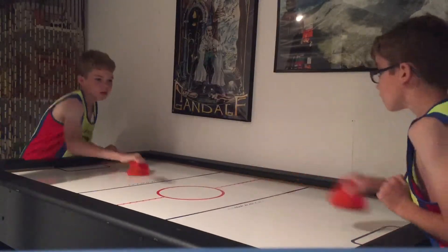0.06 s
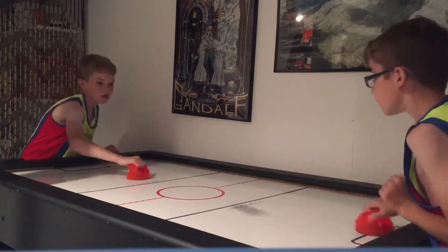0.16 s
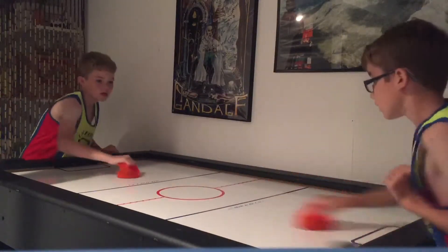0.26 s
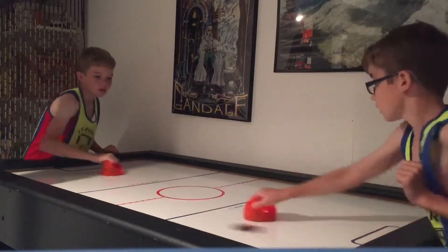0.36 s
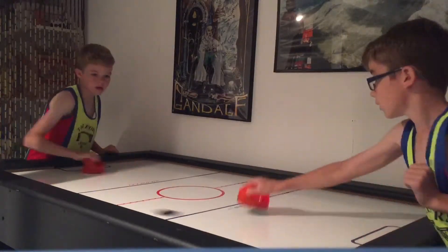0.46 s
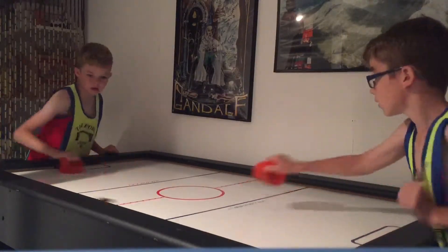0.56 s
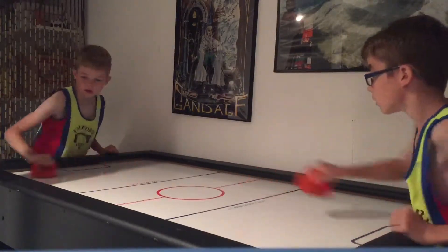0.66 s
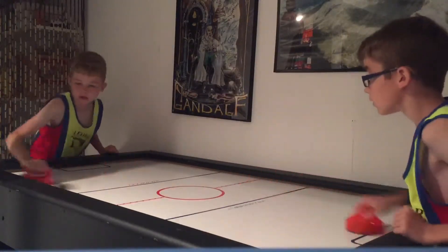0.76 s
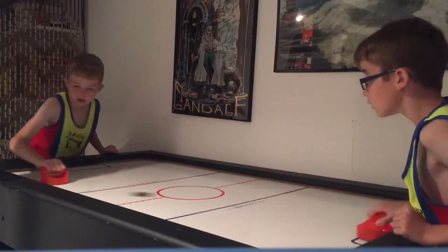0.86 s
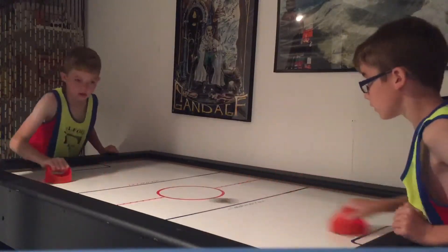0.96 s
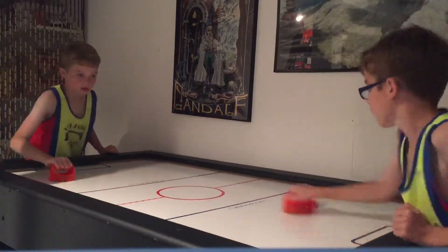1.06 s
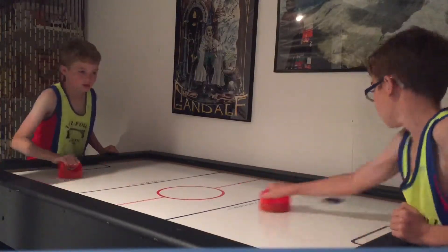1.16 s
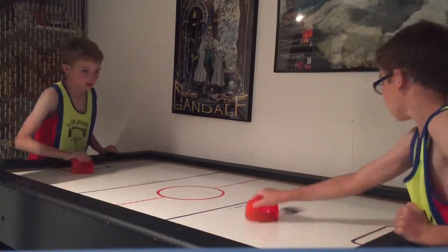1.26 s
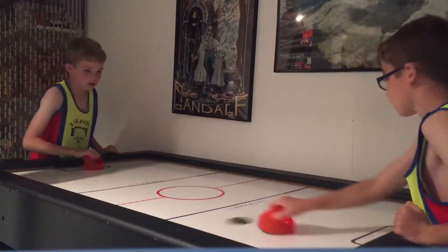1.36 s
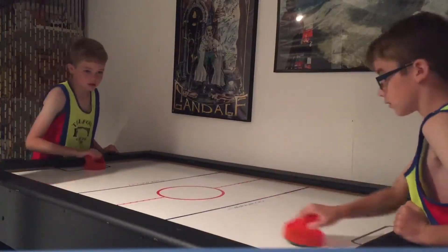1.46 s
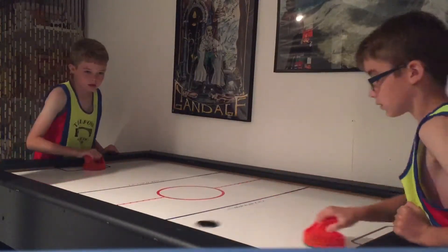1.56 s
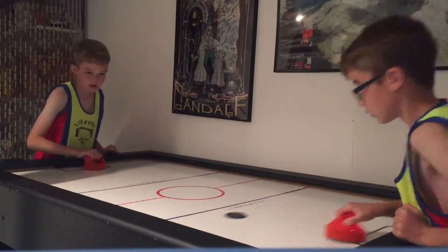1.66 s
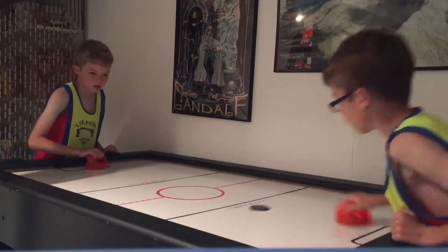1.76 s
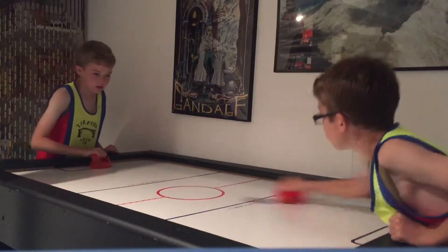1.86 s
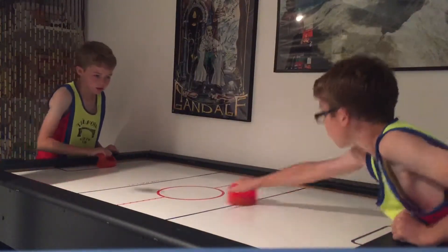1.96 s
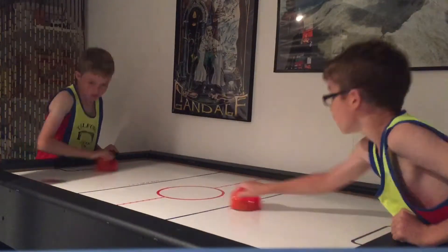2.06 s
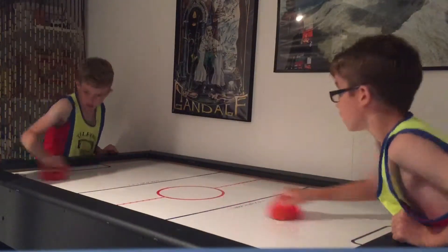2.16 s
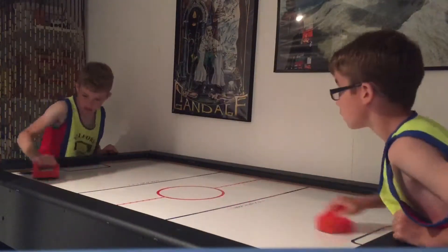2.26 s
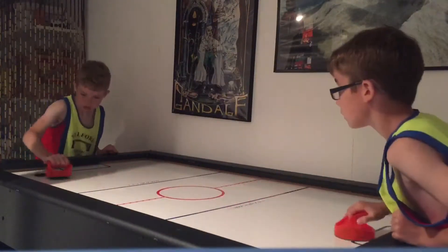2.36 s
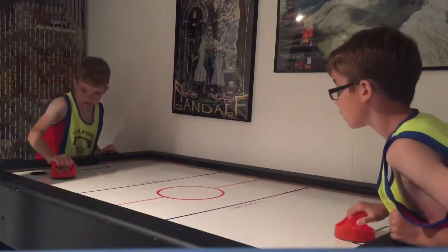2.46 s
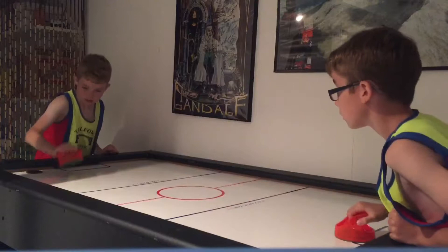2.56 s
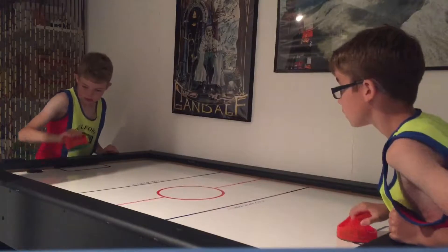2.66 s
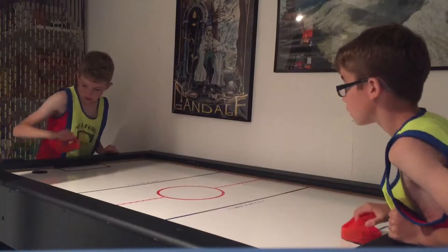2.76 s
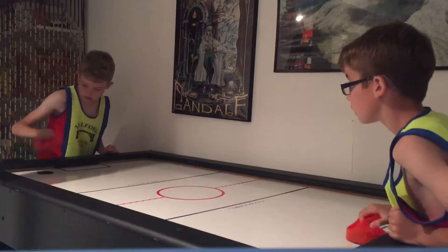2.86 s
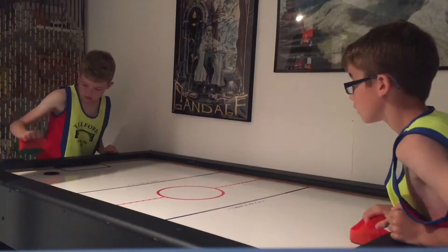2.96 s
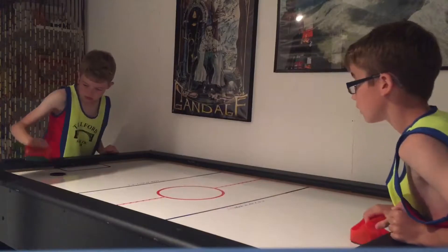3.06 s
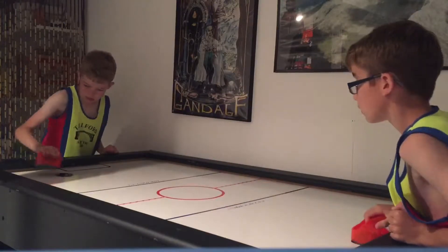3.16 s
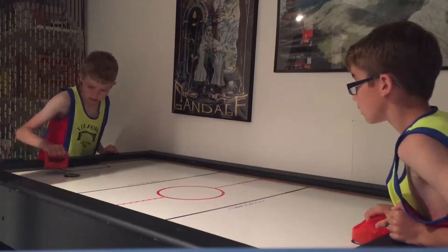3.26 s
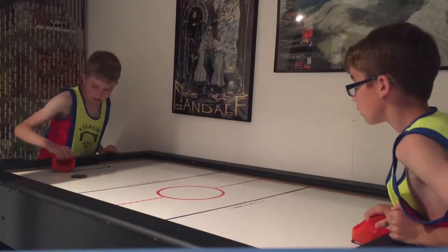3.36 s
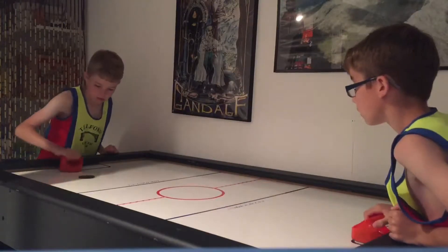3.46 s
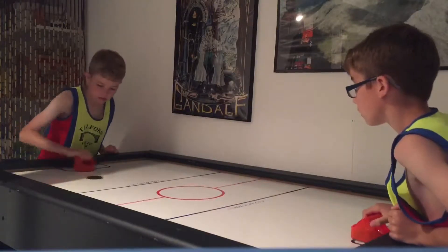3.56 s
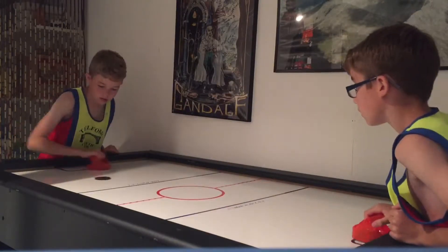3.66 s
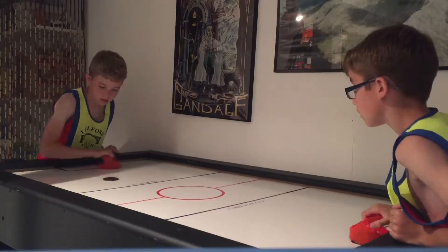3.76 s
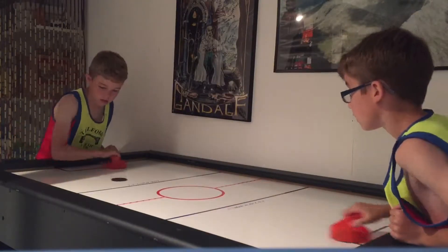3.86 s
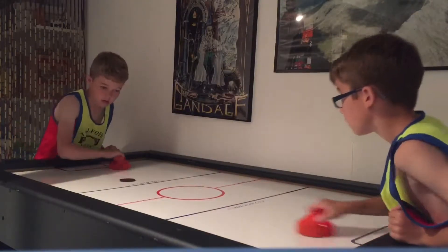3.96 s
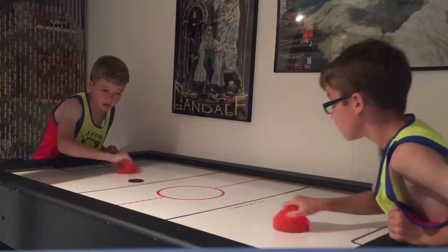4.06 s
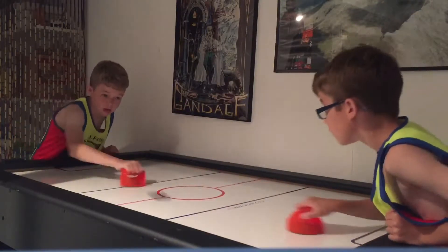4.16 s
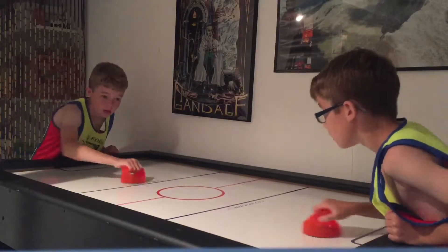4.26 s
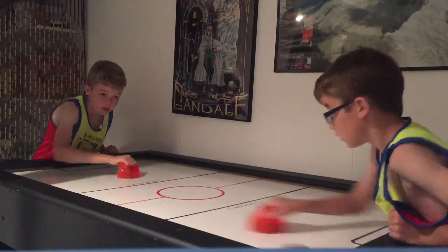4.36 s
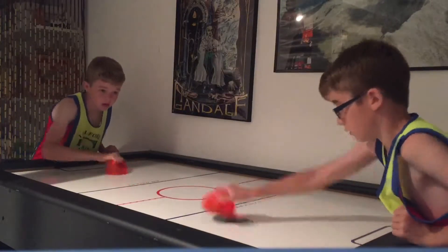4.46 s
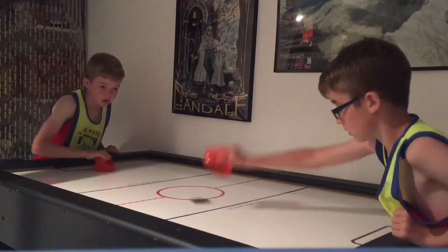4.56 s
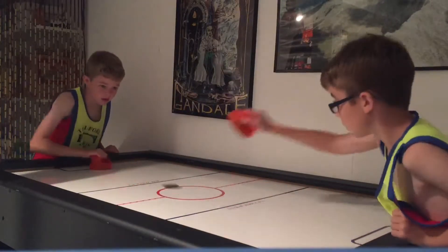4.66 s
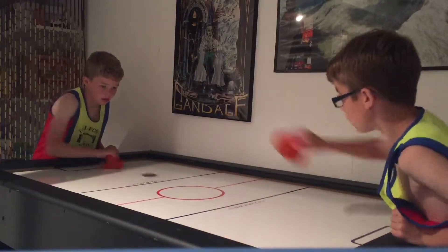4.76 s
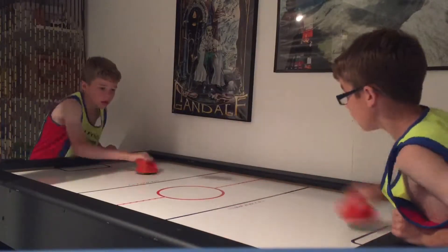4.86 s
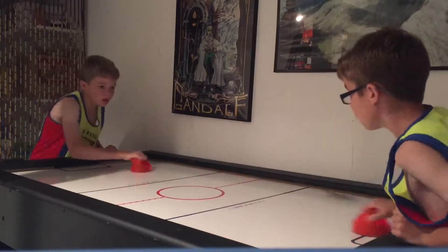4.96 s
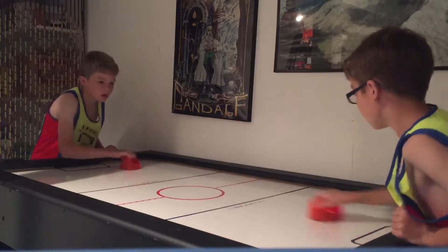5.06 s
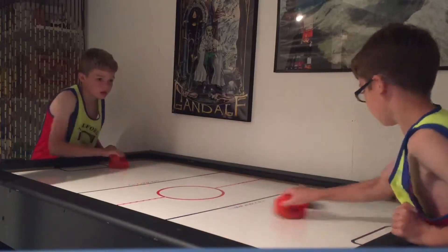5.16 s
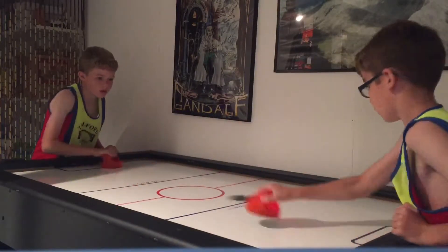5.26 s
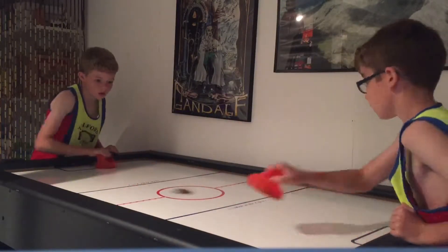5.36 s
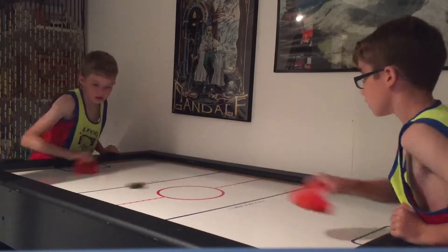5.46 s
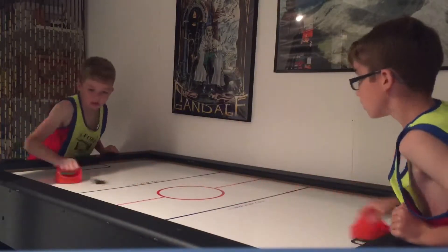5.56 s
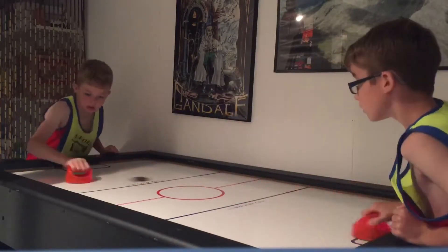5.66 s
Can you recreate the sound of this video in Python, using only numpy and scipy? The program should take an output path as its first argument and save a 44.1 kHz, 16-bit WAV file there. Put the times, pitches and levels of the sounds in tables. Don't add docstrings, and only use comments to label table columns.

```python
import sys
import numpy as np
from scipy import signal
from scipy.fft import rfft, irfft
from scipy.io import wavfile

SR = 44100
rng = np.random.default_rng(int(sys.argv[2]) if len(sys.argv) > 2 else 0)


def bounce(signal):
    frames = np.transpose(np.atleast_2d(signal))
    limited = np.clip(frames, -1, 1)
    pcm = np.round(limited * 32767).astype(np.int16)
    wavfile.write(sys.argv[1], SR, pcm)


def magnitude_from_level(level_db):
    exponent = np.asarray(level_db, float) / 20
    return 10 ** exponent


N = 251804
LEAD = SR // 2
PLACES = 3
SILENT_DB = -120

# start in seconds, clack level in dB,
# hollow tone and bending ring, both in dB relative to the clack.
MALLET_HITS = [
    (0.1045, -1.5, -17.5, -9),
    (0.7908, 0, -6.5, -10.5),
    (1.9214, -8.5, -7, -17),
    (2.2674, -7.5, -31.5, -27.5),
    (4.1844, -4, -19.5, -43),
    (4.8792, -1, -14, -23),
]
MALLET_CRACK_DB, MALLET_ROOM_DB = -2.5, -1.5
# start in seconds, clack level in dB, # crack in dB relative to the clack, distance as room
# share in dB.
RAIL_HITS = [(0.3192, 2, -18.5, 1.55), (1.1278, -8.5, -11.5, -1), (1.1866, 3.5, -17, -0.16),
             (1.5403, -4, -21.5, -1.3), (1.5462, -4.5, -22, -2.5), (2.1975, -4, -18, 2.5),
             (2.2105, -2, -14.5, -1.5), (2.3199, -6.5, -15.5, -1.5), (2.4128, -12, -10, -2.5),
             (4.3472, -10, -18.5, 7.5), (4.4002, 1, -21.5, 0.2)]
EARLIER_RAIL_HIT = (2.5, -13, 2.5)
EARLIER_AGO_S = 0.42
RAIL_TONE_DB, RAIL_RING_DB = -8.5, -32.5
# start in seconds, clack level in dB,
# crack and bending ring, both in dB relative to the clack, room share in dB.
EDGE_HITS = [
    (4.983, -10, -3.5, -9, 1.5),
    (5.0859, -20.5, -2, 0, 1),
    (5.1059, -0.7, -10, -3, -1.2),
    (5.1628, -13, -24, -2.1, -12),
    (5.2218, -15, -2, -23, -2),
    (5.4533, -25.5, -1, -6, 4.5),
    (5.5618, -22.5, 0.3, -1, 0),
    (5.6561, -9, -2.5, -3, 0.5),
]
EDGE_TONE_DB = -5.5
# start in seconds, clack level in dB.
TAPS = [
    (0.7714, -24),
    (2.6994, -35),
    (2.9693, -58.5),
    (5.008, -23),
    (5.6285, -23),
]
TAP_TONE_DB, TAP_RING_DB, TAP_CRACK_DB = 8, -29, -28
# start in seconds, knock of the top in dB,
# boom of the box in dB relative to the knock.
THUDS = [(0.107, -9, -19.5), (0.165, -18, -16.5), (0.22, -13, -20), (0.322, -20, -30), (0.661, -52, -9),
         (0.794, -20, -15), (0.831, -6.5, -17.5), (1.127, -17.5, -29), (1.2, -25.5, -39), (1.542, -41, -28),
         (1.839, -37, -4), (1.921, -15.5, -17), (1.97, -18, -17), (2.208, -30.5, -8.5), (2.273, -18, -22),
         (2.421, -38, -9), (3.454, -40.5, -3.5), (3.495, -43, -3), (3.687, -33, -11), (4.189, -19, -14.5),
         (4.26, -23, -21), (4.397, -25, -33), (4.88, -5.5, -17.5), (4.96, -15, -14), (5.015, -16.5, -30),
         (5.108, -28, -36), (5.629, -9, -16.5), (5.659, -12, -22)]
THUD_ROOM_DB = 23
# end in seconds, swell in seconds,
# hiss at the end in dB, dying in seconds.
SWEEPS = [
    (3.707, .017, -58, .018),
    (4.18, 0.42, -61.5, .07),
    (4.87, 0.16, -62, .08),
]
SWELL_DB, DYING_DB = 19, 23

WOBBLE_FROM_S, WOBBLE_RISE_S, WOBBLE_DB, WOBBLE_FADE_DB_PER_S = 4.95, 0.1, -38, 8
CHATTER_S, CHATTER_RISE_S, CHATTER_DB, CHATTER_FADE_DB = 5.12, 0.045, -23.5, 123
WOBBLE_UNEVEN_DB = 4

# resonance in Hz, width in Hz, level in dB.
CLACK = [(1000, 295, -1.5), (1725, 457, -2), (2090, 357, 0), (2627, 484, -2.5), (3600, 645, -9)]
# resonance in Hz, width in Hz, level in dB.
HOLLOW_RAIL = [(351.6, 97, -6.5), (463, 136, -2), (640.5, 88, 4.5), (873, 91, -1.5)]
# resonance in Hz, width in Hz, level in dB.
PUCK_BENDING = [(1712, 80, -7), (3815, 90, 0)]
# resonance in Hz, width in Hz, level in dB.
PUCK_HIGH = [(3257, 390, 2.5), (5620, 250, 0.5), (6485, 130, 2.5), (7300, 200, 0), (9560, 400, -1.5),
             (10600, 60, -15.5), (13030, 200, -3), (15400, 470, -6.5)]
# resonance in Hz, width in Hz, level in dB.
RIM_HIGH = [(5700, 350, -6), (6470, 90, 0), (7000, 250, -5), (9550, 300, -5), (10700, 220, -6),
            (13300, 250, -14), (14900, 500, -13)]
EDGE_DULL_HZ, EDGE_RIM_DB = 4700, 12
FIRST_TOUCH_DB = 8.5
# resonance in Hz, width in Hz, level in dB.
TABLE_TOP = [(170, 41.4, 1), (198, 42.7, 2.5), (237, 47.5, -2), (349, 114, -3.5)]
# resonance in Hz, width in Hz, level in dB.
BOX = [(63, 16, -1.5), (82.4, 28.6, -0.92)]

# frequency in Hz, time to fall 60 dB in seconds.
ROOM_T60 = [(60, 0.85), (200, 0.65), (500, 0.76), (1000, 0.73), (2000, 0.85), (4000, 0.81), (8000, 0.59),
            (16000, 0.28)]
# frequency in Hz, level in dB.
ROOM_COLOUR = [(60, -12.5), (200, 2.5), (600, 0), (2000, 1.5), (5000, -1), (10000, -6), (16000, -2)]
ROOM_DB = 0.5
LATE_DB, LATE_STRETCH = -16.5, 1.97

# frequency in Hz, level in dB per Hz.
BLOWER_AIR = [(20, -32), (45, -15), (85, -7), (112, -14), (135, -17.5), (280, -12), (363, -10.5),
              (624, -6.5), (960, -4.5), (1160, -14.5), (2160, -18), (6380, -39), (9000, -44.5),
              (16000, -62)]
# frequency in Hz, width in Hz, rms level in dB.
BLOWER_TONES = [(875, 89, -49.5), (1730, 207, -64), (3500, 270, -65.5), (5470, 230, -78.5),
                (6800, 150, -80.5), (8060, 170, -71), (9300, 150, -83)]
BLOWER_DB, BLOWER_UNEVEN_DB = -41.5, 2.5
HUM_HZ, HUM_DB = 102.7, -54
TOP_HZ = 15850


def blow_rows():
    rows = []
    for s, db, tone, ring in MALLET_HITS:
        rows.append((s, db, tone, ring, MALLET_CRACK_DB, SILENT_DB, MALLET_ROOM_DB))
    for s, db, crack, far in [(-EARLIER_AGO_S, *EARLIER_RAIL_HIT)] + list(RAIL_HITS):
        rows.append((s, db, RAIL_TONE_DB, RAIL_RING_DB, crack, SILENT_DB, far))
    for s, db, crack, ring, far in EDGE_HITS:
        rows.append((s, db, EDGE_TONE_DB, ring, SILENT_DB, crack, far))
    for s, db in TAPS:
        rows.append((s, db, TAP_TONE_DB, TAP_RING_DB, TAP_CRACK_DB, SILENT_DB, 0))
    return sorted(rows)


def blows():
    s, db, low_db, ring_db, crack_db, rim_db, room_db = np.transpose(blow_rows())
    hit = strikes(s, db, room_db, 0.99, 0.0047, 0.007, to_room_db=22.0)
    clack = cut(body(hit, CLACK, 6.44), 936, "high", order=4)

    hollow_hit = strikes(s, db + low_db, room_db, 0.21, 0.0046, 0.013, to_room_db=22.0)
    hollow = body(hollow_hit, HOLLOW_RAIL, 11.36)

    bending_hit = strikes(s, db + ring_db, room_db, 0.26, 0.0045, 0.0044, to_room_db=19.0)
    ring = body(bending_hit, PUCK_BENDING, 21.7)

    contact = strikes(s, db + crack_db, room_db, 0.39, 0.0056, 0.0016, to_room_db=22.0)
    crack_noise = cut(cut(contact, 3900, "high"), 6500, "low", order=1)
    crack = magnitude_from_level(2.0) * crack_noise + body(contact, PUCK_HIGH, 6.6)

    edge = strikes(s, db + rim_db, room_db, 0.47, 0.0065, 0.002, to_room_db=20.0)
    rim_noise = cut(cut(edge, 4200, "high"), EDGE_DULL_HZ, "low", order=1)
    rim = magnitude_from_level(-1.5) * rim_noise + body(edge, RIM_HIGH, EDGE_RIM_DB)
    return clack + hollow + ring + crack + rim


def strikes(s, level_db, room_db, start, rise_s, fall_s, to_room_db):
    t = np.arange(SR // 20) / SR
    rise = np.minimum(start + (1 - start) * (t / rise_s) ** 2, 1)
    shape = rise * np.exp(-np.maximum(t - rise_s, 0) / fall_s)
    out = np.full((1 + PLACES, N + LEAD), 1e-18)
    at = (s * SR).round().astype(int) + LEAD
    grains = rng.standard_normal((len(s), len(t)))
    grains[:, 0] = magnitude_from_level(FIRST_TOUCH_DB)
    for i, db, grain in zip(at, level_db, grains):
        out[0, i:i + len(t)] += (magnitude_from_level(db) * shape * grain)[:N + LEAD - i]
    out[1 + np.arange(len(s)) % PLACES, at] = magnitude_from_level(level_db + room_db + to_room_db)
    return out


def body(bursts, modes, gain_db):
    out = 0
    for k, (hz, width, db) in enumerate(modes):
        out = out + (-1) ** k * magnitude_from_level(db) * resonate(bursts, hz, width)
    return magnitude_from_level(gain_db) * out


def thuds():
    s, db, boom_db = np.transpose(THUDS)
    knock_hit = strikes(s, db, 0, 0.86, 0.0068, 0.0099, to_room_db=THUD_ROOM_DB)
    boom_hit = strikes(s, db + boom_db, 0, 0.96, 0.012, 0.015, to_room_db=32.0)
    knock = body(knock_hit, TABLE_TOP, 17.05)
    boom = body(boom_hit, BOX, 30.6)
    return cut(knock + boom, 450, "low", order=4)


def wobble():
    ticks_per_s = 1500.0
    ticks = (rng.random(N + LEAD) < ticks_per_s / SR) * rng.standard_normal(N + LEAD) + 1e-18
    ringing = body(ticks, PUCK_BENDING, 3.2) + body(ticks, RIM_HIGH, -7)
    ringing = ringing + magnitude_from_level(-25.5) * cut(ticks, 9000, "low")
    steady = swell(WOBBLE_FROM_S + WOBBLE_RISE_S, WOBBLE_RISE_S, WOBBLE_DB, 7.5, 1, WOBBLE_FADE_DB_PER_S)
    chatter = swell(CHATTER_S, CHATTER_RISE_S, CHATTER_DB, 20, 0.74, CHATTER_FADE_DB)
    uneven = magnitude_from_level(WOBBLE_UNEVEN_DB * flicker(13, N + LEAD))
    return level_in_time([steady, chatter]) * uneven * rms_one(ringing)


def sweeps():
    spans = [swell(s, rise_s, db, SWELL_DB, fall_s, DYING_DB) for s, rise_s, db, fall_s in SWEEPS]
    hiss = rms_one(cut(rng.standard_normal(N + LEAD), 8000, "high"))
    return level_in_time(spans) * hiss


def room():
    t = np.arange(SR) / SR
    white = rng.standard_normal((2, PLACES, SR))
    edges = 45 * 2 ** np.arange(0, 9, 0.5)
    out = 0
    for k, (low, high) in enumerate(zip(edges, edges[1:])):
        hz = np.sqrt(low * high)
        half_octave = signal.butter(2, [low, high], "band", fs=SR, output="sos")
        band = signal.sosfilt(half_octave, white[k % 2])
        fall_db = -60 * t / at_hz(ROOM_T60, hz)
        decay = np.hypot(magnitude_from_level(fall_db), magnitude_from_level(LATE_DB + fall_db / LATE_STRETCH))
        out = out + band * magnitude_from_level(at_hz(ROOM_COLOUR, hz)) * decay
    clusters = rms_one(cut(cut(rng.standard_normal((PLACES, SR)), 110, "low"), 35, "high"))
    out = out * magnitude_from_level(2.23 * clusters * np.exp(-t / 0.059))
    build_up = np.clip((t - 0.004) / 0.0068, 0, 1)
    return magnitude_from_level(ROOM_DB) * build_up * out / np.sqrt(np.sum(out ** 2) / PLACES)


def blower():
    hz = np.maximum(np.fft.rfftfreq(N, 1 / SR), 1)
    spectrum = rfft(rng.standard_normal(N)) * magnitude_from_level(at_hz(BLOWER_AIR, hz))
    air = magnitude_from_level(BLOWER_DB) * rms_one(irfft(spectrum, N))
    for tone_hz, width, db in BLOWER_TONES:
        level = magnitude_from_level(db + BLOWER_UNEVEN_DB * flicker(3.8, N))
        tone = resonate(resonate(rng.standard_normal(N), tone_hz, width), tone_hz, width)
        air = air + level * rms_one(tone)
    hum = rms_one(np.sin(2 * np.pi * HUM_HZ * np.arange(N) / SR))
    return air + magnitude_from_level(HUM_DB) * hum


def rms_one(x):
    return x / np.sqrt(np.mean(x ** 2) + 1e-20)


def at_hz(points, hz):
    table_hz, values = np.transpose(points)
    return np.interp(np.log(hz), np.log(table_hz), values)


def resonate(x, hz, width):
    r = np.exp(-np.pi * width / SR)
    feed = (1 - r * r) / 2 * np.array([1, 0, -1])
    return signal.lfilter(feed, [1, -2 * r * np.cos(2 * np.pi * hz / SR), r * r], x)


def cut(x, hz, kind, order=2):
    return signal.sosfilt(signal.butter(order, hz, kind, fs=SR, output="sos"), x)


def convolve(x, response):
    return signal.fftconvolve(x, response)[:len(x)]


def swell(top_s, rise_s, db, rise_db, fall_s, fall_db):
    return [(top_s - rise_s, db - rise_db), (top_s, db), (top_s + fall_s, db - fall_db)]


def level_in_time(spans):
    t = (np.arange(N + LEAD) - LEAD) / SR
    gain = 0
    for corners in spans:
        gain = gain + magnitude_from_level(np.interp(t, *np.transpose(corners), left=SILENT_DB, right=SILENT_DB))
    return gain


def flicker(rate_hz, length):
    return rms_one(cut(rng.standard_normal(length + SR), rate_hz, "low")[SR:])


def scene():
    near, *far = blows() + thuds()
    rim, echoes = wobble(), room()
    wet = sum(convolve(x, response) for x, response in zip(far, echoes))
    wet = wet + convolve(rim, echoes[0])
    return (near + rim + sweeps() + wet)[None, LEAD:] + blower()


def band_limit(x):
    return signal.sosfilt(signal.butter(12, 16500, fs=SR, output="sos"), x)


def record(dry):
    x = dry / (1 + (np.abs(dry) / 1.05) ** 4) ** 0.25
    x = cut(x, 53.4, "high", order=4)
    x = signal.sosfilt(signal.ellip(8, 1, 28, TOP_HZ, fs=SR, output="sos"), x)
    return band_limit(x)


dry = scene()
out = record(dry)
bounce(out)
```